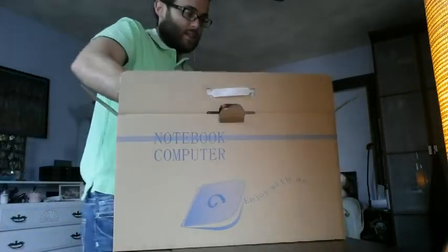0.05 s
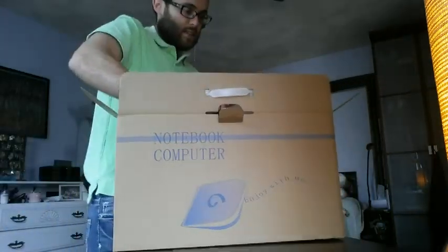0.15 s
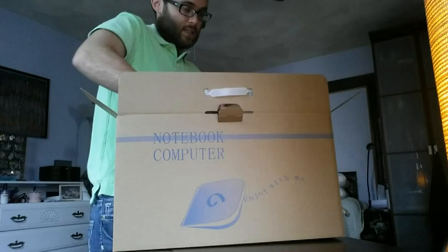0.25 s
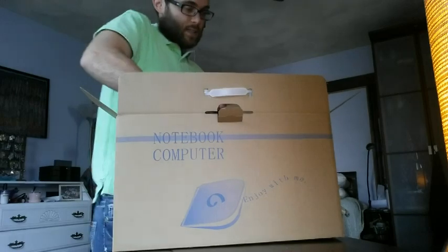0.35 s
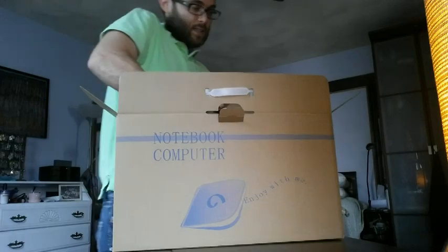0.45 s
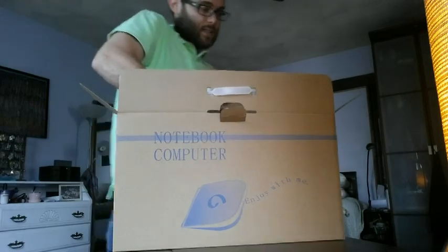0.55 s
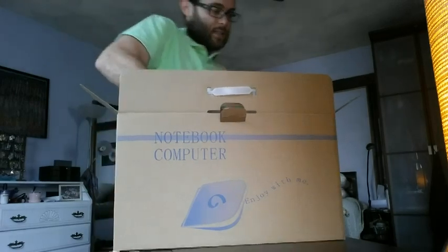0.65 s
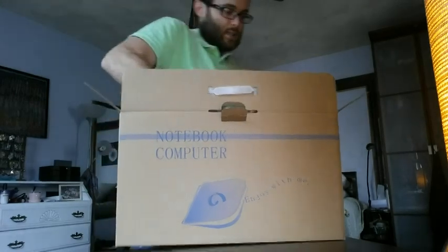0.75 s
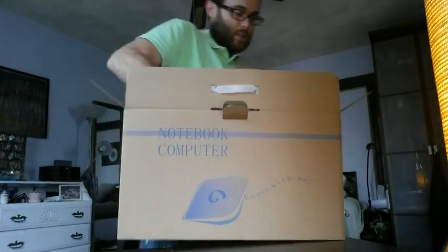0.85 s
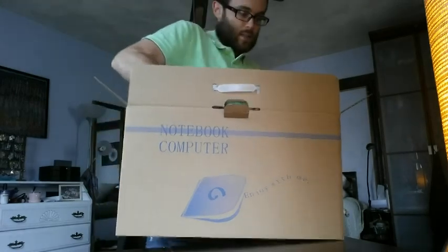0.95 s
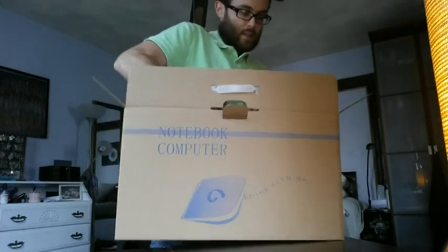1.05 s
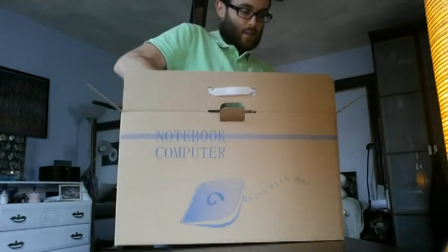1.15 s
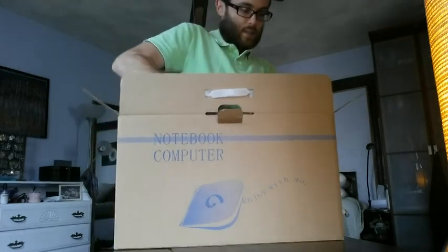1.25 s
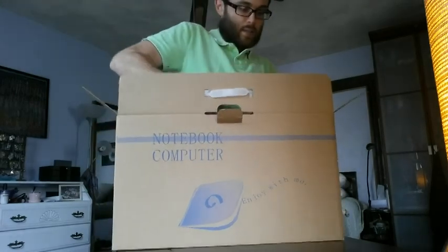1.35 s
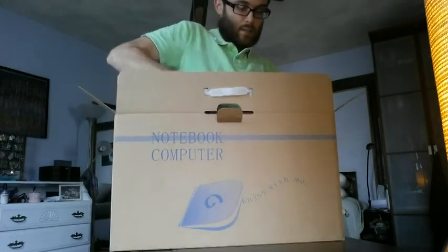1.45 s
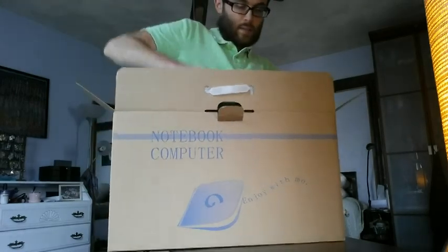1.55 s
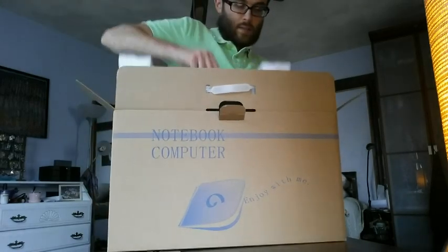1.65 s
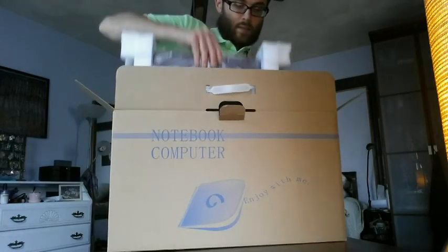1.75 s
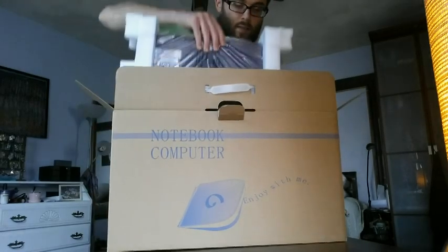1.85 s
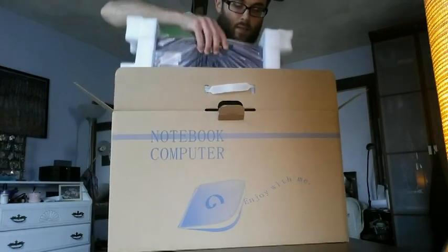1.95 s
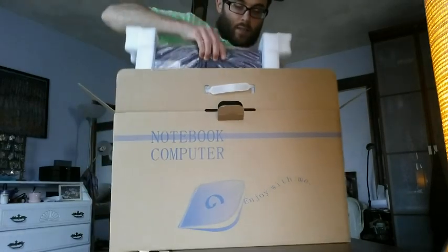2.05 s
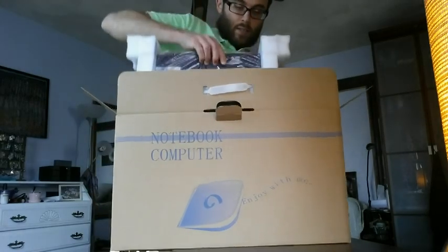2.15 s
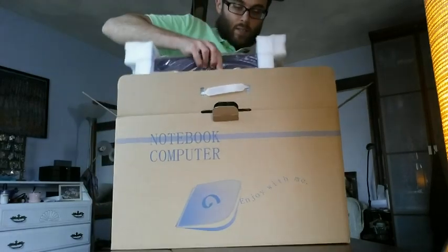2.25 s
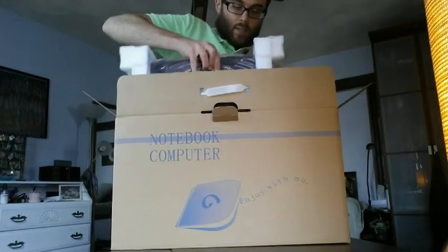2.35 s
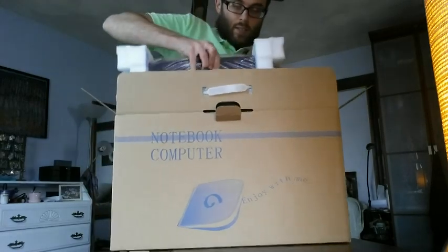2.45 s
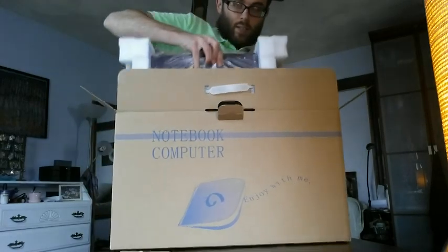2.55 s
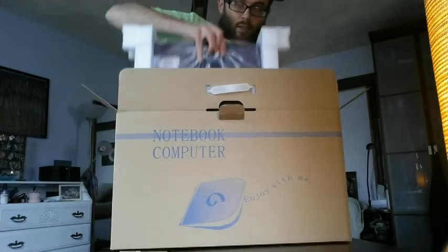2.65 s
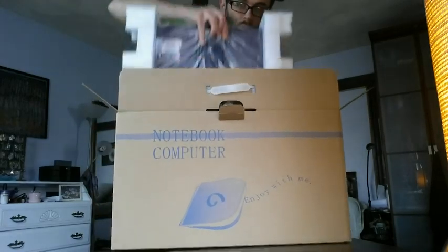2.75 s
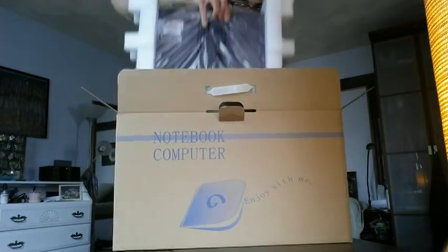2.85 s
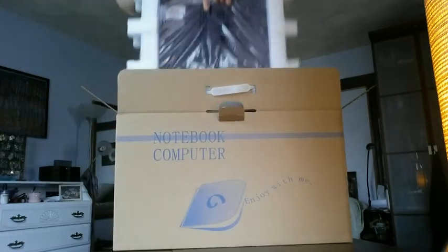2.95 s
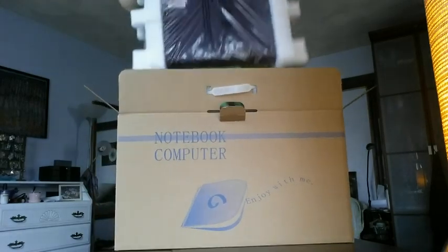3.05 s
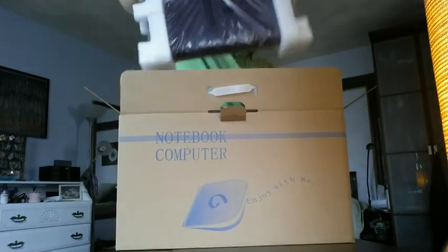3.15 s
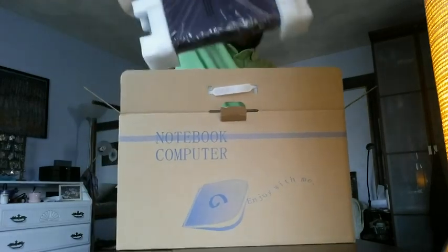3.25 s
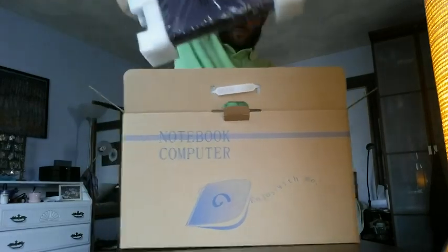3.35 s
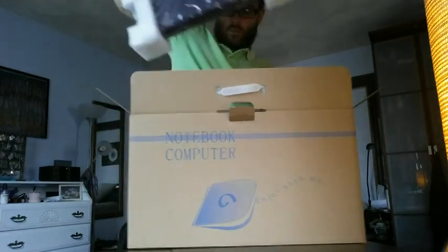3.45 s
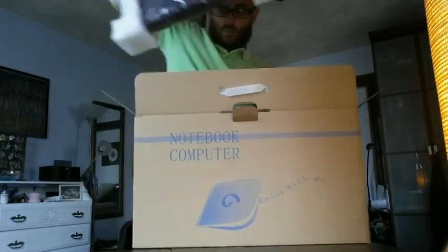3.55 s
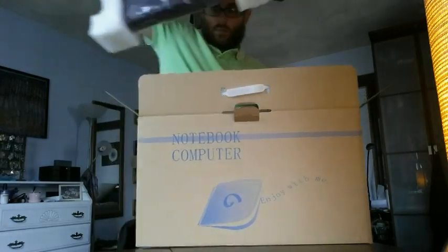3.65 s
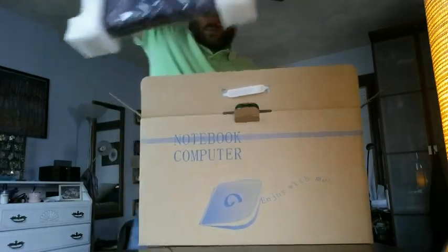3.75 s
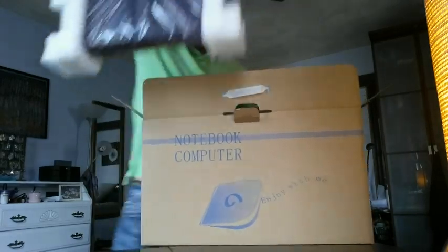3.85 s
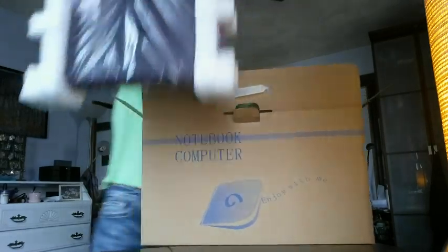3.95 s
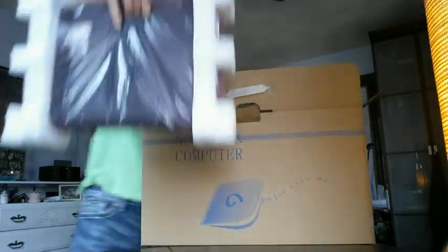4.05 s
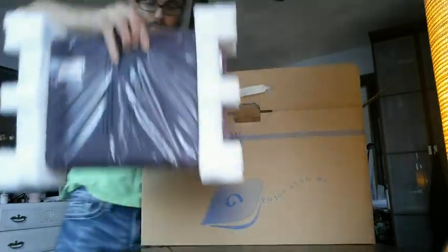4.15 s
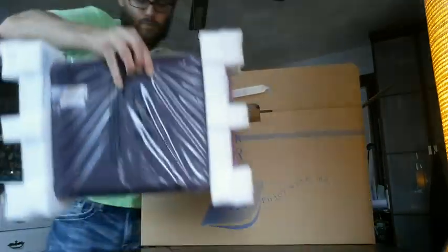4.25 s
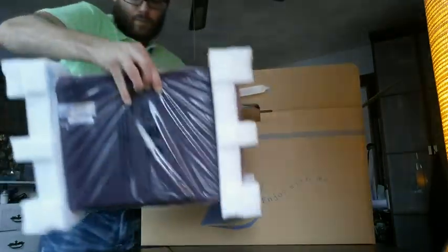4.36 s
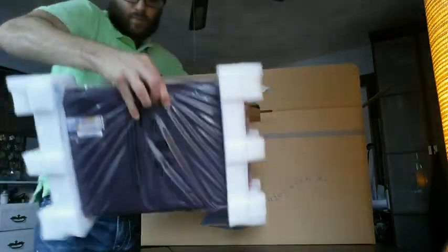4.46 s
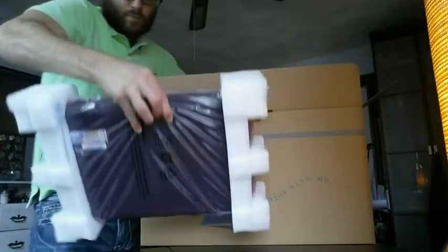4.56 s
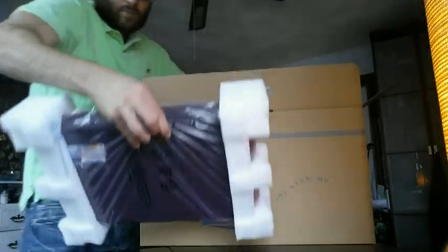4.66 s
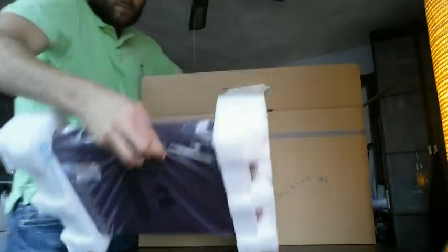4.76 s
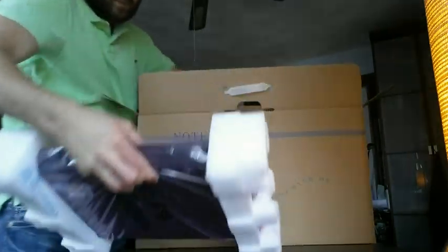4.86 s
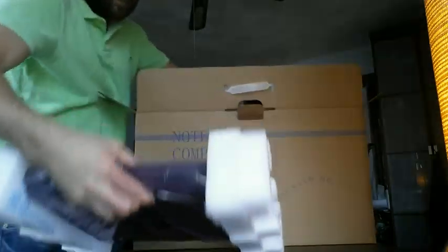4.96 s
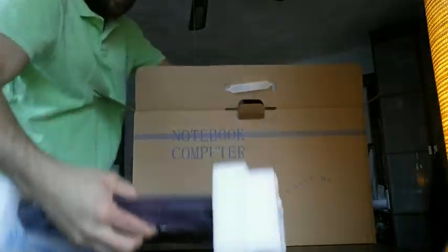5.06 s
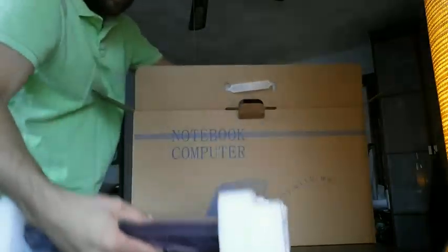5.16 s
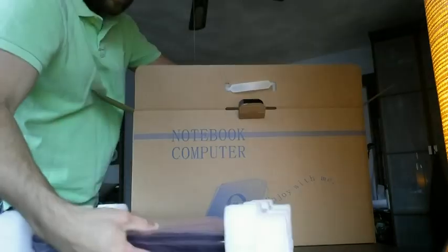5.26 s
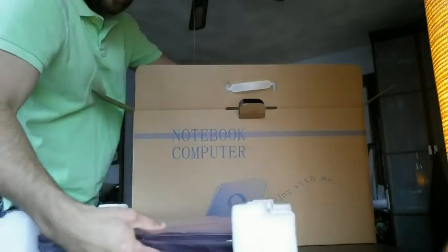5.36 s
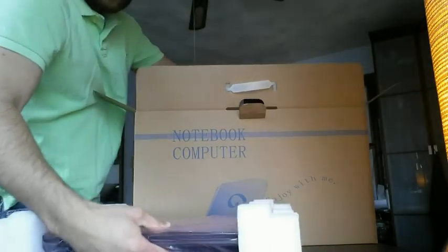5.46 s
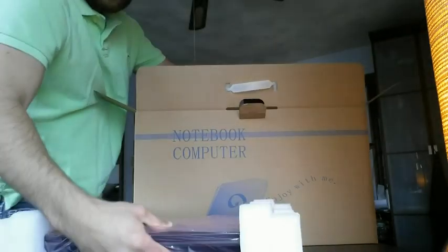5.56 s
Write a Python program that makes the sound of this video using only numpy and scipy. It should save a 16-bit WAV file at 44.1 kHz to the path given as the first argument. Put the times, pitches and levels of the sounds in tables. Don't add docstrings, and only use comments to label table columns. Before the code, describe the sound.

Close, bright, nearly mono indoor sound of unpacking: brittle plastic crackle and dry foam scraping against cardboard, low box bumps beneath. One loud snap at about a second and a half, then rougher dragging with hollow thumps. Around three seconds the emptied carton lands in a rapid cluster of dull booms and clatter, then faint handling, and finally renewed crinkly rustling over faint room hush.

```python
import sys
import numpy as np
from scipy import signal
from scipy.fft import rfft, irfft
from scipy.io import wavfile
from scipy.ndimage import map_coordinates

SR = 44100
rng = np.random.default_rng(int(sys.argv[2]) if len(sys.argv) > 2 else 0)


def voltage_ratio(level):
    return 10 ** (np.asarray(level, float) / 20)


def waveform_to_disk(signal):
    frames = np.transpose(np.atleast_2d(signal))
    scaled = np.clip(frames, -1, 1) * 32767
    samples = np.round(scaled).astype(np.int16)
    wavfile.write(sys.argv[1], SR, samples)


N = 247709

# f/Hz, density/dB
SLEEVE_HISS = [(2650, -49.5), (4500, -14.5), (5180, -11), (6340, 2.5), (6600, 0), (8580, -16), (11000, -20),
               (13000, -26.5), (15000, -39), (16500, -63)]
# f/Hz, density/dB
FOAM_SCRAPE = [(560, -15.5), (950, -8.5), (1020, -9.5), (1380, -5.5), (1560, -7), (3790, -6.5), (4800, -9),
               (6240, -8), (10600, -120)]
TOUCH_S = [0.0, .004, .0115, .021]
EMPTY_S = 3.05


def rms_one(x):
    return x / np.sqrt(np.mean(x ** 2) + 1e-20)


def drift(rate):
    r = np.exp(-2 * np.pi * rate / SR)
    walk = signal.lfilter([1], [1, -2 * r, r * r], rng.standard_normal(N + SR))
    return rms_one(walk[SR:])


def colour(spectrum):
    hz, db = np.transpose(spectrum)
    grid = np.maximum(np.arange(4097) * SR / 8192, 1)
    log_gain = np.interp(np.log(grid), np.log(hz), db) * np.log(10) / 20
    cepstrum = irfft(log_gain)
    cepstrum[1:4096] *= 2
    cepstrum[4097:] = 0
    pulse = irfft(np.exp(rfft(cepstrum)))
    return pulse / np.sqrt(np.sum(pulse ** 2))


def through(x, spectrum):
    return signal.fftconvolve(x, colour(spectrum))[:N]


def grains(per_s, spread_db, smooth):
    sizes = voltage_ratio(spread_db * np.minimum(rng.exponential(1, N), 5)) * rng.choice([-1, 1], N)
    slips = rms_one(sizes * (rng.random(N) < per_s / SR))
    return rms_one(slips + smooth * rng.standard_normal(N))


def ring(force, modes):
    out = 0
    for hz, db, t60 in modes:
        r, w = voltage_ratio(-60 / (t60 * SR)), 2 * np.pi * hz / SR
        out = out + signal.lfilter([0, voltage_ratio(db) * np.sin(w)], [1, -2 * r * np.cos(w), r * r], force + 1e-18)
    return out


def patchy(x, depth_db, per_s, per_octave):
    hz, s, frames = signal.stft(x, SR, nperseg=256)
    rows, columns = np.meshgrid(per_octave * np.log2(hz / 200 + 1), per_s * s, indexing="ij")
    field = map_coordinates(rng.standard_normal((40, 200)), [rows, columns], order=1, mode="wrap")
    return signal.istft(frames * voltage_ratio(depth_db * field), SR, nperseg=256)[1][:N]


def hush():
    # f/Hz, density/dB
    floor = [(18, -31), (30, -29), (91, -17.5), (243, 3.5), (451, -13), (583, 0), (775, -15.5),
             (1400, -10.5), (2470, -14.5), (5230, -14), (6590, -4.5), (11300, -19), (14300, -27.5)]
    return voltage_ratio(-57.5 + 1.6 * drift(14)) * through(rng.standard_normal(N), floor)


def room(x):
    t60_s, wall_cut_hz, gap_s = 0.21, 4800, .004
    t = np.arange(SR // 2) / SR
    tail = rng.standard_normal(len(t)) * voltage_ratio(-60 * t / t60_s) * (t > gap_s)
    tail = signal.sosfilt(signal.butter(1, wall_cut_hz, fs=SR, output="sos"), tail)
    return signal.fftconvolve(x, tail / np.sqrt(np.sum(tail ** 2)))[:N]


def bumps():
    # t/s, thud level/dB, hollow ring level/dB, table level/dB, panel level/dB
    contacts = [(0.221, -47, -28, -49, -50), (0.489, -39, -59, -35.5, -39), (0.585, -29, -47, -48, -45),
                (0.789, -52, -52, -55, -42), (1.034, -35, -46, -37, -51), (1.508, -31, -18.5, -35, -45),
                (2.008, -33, -16, -30, -46), (2.312, -29, -23.5, -48, -50.5), (2.483, -35, -53, -50, -48),
                (2.776, -49, -54, -54, -42), (3.125, -30, -30, -22, -30), (3.216, -20, -39, -40, -36.5),
                (3.256, -28, -39, -46, -44), (3.312, -10, -13, -32, -32.5), (3.421, -14, -17.5, -36, -34),
                (3.487, -34, -15.5, -35, -43), (3.6, -60, -41, -60, -52), (3.895, -70, -70, -75, -61),
                (4.288, -55, -44, -68, -58.5), (4.435, -38, -55, -59, -56), (4.83, -43, -59, -72, -55),
                (5.352, -58, -56, -68, -54)]
    # f/Hz, level/dB, t60/s
    hollow = [
        (140, 0, .06),
        (129, -7, .38),
        (98, 2, .22),
    ]
    # f/Hz, level/dB, t60/s
    walls = [(202, -2.5, 0.082), (279, -1.5, 0.17), (336, 3, 0.054), (512, -6, 0.13), (553, 13, 0.015),
             (554, 6.5, 0.05), (760, -5, 0.076), (830, -22, 0.072)]
    touch_db = [-9, -7, -7.5, -11]
    large_panel_db, loaded_t60_s = -2, .3
    out, t = np.zeros(N + SR), np.arange(SR // 2) / SR

    flex = np.sin(2 * np.pi * 115 * t) * t * np.exp(-t / 0.0026)
    booms = np.array([ring(flex / np.abs(flex).sum(), [mode]) for mode in hollow])
    touch = t * np.exp(-2 * np.pi * 380 * t)
    push = sum(voltage_ratio(db) * np.roll(touch, round(later * SR)) for later, db in zip(TOUCH_S, touch_db))
    push = push / touch.sum()

    shape = (len(contacts), len(walls))
    bends = 1 + .045 * rng.uniform(-0.55, 1, shape)
    strengths = voltage_ratio(rng.normal(0, 3.5, shape)) * rng.choice([-1, 1], shape)
    size_db = np.where(np.array(walls)[:, 0] > 420, 0, large_panel_db)
    gaps = np.diff([row[0] for row in contacts], append=N / SR + 1)
    for (s, *boom_db, panel_db), strength, bend, gap in zip(contacts, strengths, bends, gaps):
        panels = np.array([ring(push, [(hz * b, db, t60)]) for (hz, db, t60), b in zip(walls, bend)])
        sound = voltage_ratio(np.add(boom_db, 1.5)) @ booms
        sound = sound + (voltage_ratio(panel_db + size_db + 9.5) * strength) @ panels
        sound = sound * voltage_ratio(-60 * t / loaded_t60_s * (s < EMPTY_S))
        smothered = np.exp(-np.maximum(t - gap, 0) / .008)
        out[round(s * SR):][:len(t)] += sound * smothered
    return out[:N]


def snaps():
    # t/s, peak level/dB, scrape level/dB, edge level/dB
    singles = [(0.3645, -15, -47, -52), (0.5375, -17, -50, -46), (0.574, -12.5, -52, -55),
               (0.643, -17, -54, -43), (0.717, -14, -47, -41), (0.895, -24, -62, -56),
               (0.9657, -33, -33, -56), (0.9913, -13.5, -34, -50), (1.1598, -18, -40.5, -44),
               (1.504, 0, -23, -40), (1.5123, -5.5, -25, -23), (1.549, -14.5, -30, -50),
               (2.1787, -10, -30, -35), (2.2394, -19, -32, -49), (2.2656, -18, -32, -39.5),
               (2.3486, -14.5, -37, -47), (2.92, -15, -52, -52), (3.104, -21.5, -59, -53),
               (3.3124, -22, -36, -38.5), (3.8277, -15, -56, -65), (4.1614, -20, -52, -51),
               (4.276, -45, -46, -58), (4.3968, -16.5, -31.5, -49), (4.8831, -16.5, -32, -63),
               (4.9093, -14.5, -43, -46), (5.1247, -10, -55, -44), (5.159, -14, -53, -45),
               (5.466, -18, -46, -55), (5.3542, -11.5, -50, -42), (5.4927, -17, -36, -44)]
    # t/s, peak level/dB, scrape level/dB, edge level/dB, loss per touch/dB
    runs = [(0.7871, -5, -31.5, -27, 6.5), (1.987, -11, -32.5, -41, 2.5), (2.0322, -8.5, -27, -45, 10),
            (2.3024, -10, -36, -33, 13), (2.4526, -11, -41, -37, 3), (2.5107, -9.5, -37, -37.5, 16),
            (3.1221, -1.5, -22, -26.5, 0.6), (3.2161, -2, -22.5, -41, 3), (3.3185, -7, -27.5, -46, 3.5),
            (3.423, -12.5, -31, -39.5, 2), (3.4917, -27, -34, -55, 9)]
    # f/Hz, density/dB
    edge = [(5000, -33.5), (9000, -13), (12000, 9), (15000, -5.5), (16500, -32.5)]
    edge_loss_db, snap_t60_s, run_t60_s = 8.5, 0.016, 0.022
    parts, t = np.zeros((3, N)), np.arange(SR // 5) / SR
    spatter = grains(per_s=1500, spread_db=1.0, smooth=0.58)

    events = [(*row, snap_t60_s) for row in singles]
    for s, peak_db, scrape_db, edge_db, loss_db in runs:
        for k, later in enumerate(TOUCH_S):
            events.append((s + later, peak_db - k ** 1.2 * loss_db, scrape_db - k ** 1.1 * loss_db,
                           edge_db - k * edge_loss_db, run_t60_s))
    for s, peak_db, scrape_db, edge_db, t60 in events:
        i = round(s * SR)
        shape = (1 - np.exp(-t / 0.0012)) * voltage_ratio(-60 * t / t60)
        burst = spatter[i:i + len(t)] * shape[:N - i]
        burst = burst / np.sqrt(np.sum(burst ** 2) / np.sum(shape ** 2))
        burst[12] += 4.0
        parts[:, i:i + len(t)] += voltage_ratio([[peak_db - 8.0], [scrape_db + 0.5], [edge_db + 3]]) * burst
    return through(parts[0], SLEEVE_HISS) + through(parts[1], FOAM_SCRAPE) + through(parts[2], edge)


def strokes(t, column):
    # peak t/s, rise/s, fall/s, sleeve level/dB, box wall level/dB
    grope = [(0.0, .1, .16, -37.5, -56), (0.186, 0.059, .16, -34, -50), (0.39, 0.096, 0.067, -29, -36),
             (0.502, 0.064, 0.087, -35, -44.5), (0.588, 0.0098, 0.032, -38, -64),
             (0.65, 0.045, 0.15, -39, -46.5), (0.72, 0.022, 0.1, -31, -40),
             (0.785, 0.013, 0.038, -25.5, -42), (0.84, 0.064, 0.056, -38.5, -45),
             (0.99, 0.17, .1, -44, -43.5), (1.1, 0.34, 0.1, -39, -48)]
    # peak t/s, rise/s, fall/s, sleeve level/dB, box wall level/dB
    pull = [(1.27, 0.094, 0.17, -37.5, -45), (1.471, 0.27, 0.077, -32, -44.5),
            (1.52, 0.032, 0.064, -21.5, -45), (1.721, 0.45, 0.16, -24, -39.5),
            (1.902, 0.23, 0.064, -25, -42), (2.03, 0.13, 0.19, -30.5, -44),
            (2.18, 0.026, 0.066, -34.5, -45.5), (2.27, 0.12, 0.065, -35.5, -52),
            (2.36, 0.1, 0.059, -37.5, -60), (2.42, 0.16, 0.095, -33.5, -45.5),
            (2.464, 0.025, 0.042, -30, -44.5), (2.511, 0.031, 0.023, -37, -51),
            (2.68, 0.2, 0.04, -34, -43.5), (2.793, 0.15, 0.16, -24, -45.5), (2.95, 0.088, 0.1, -35.5, -48),
            (3.008, 0.022, 0.038, -39, -64)]
    # peak t/s, rise/s, fall/s, sleeve level/dB, box wall level/dB
    handle = [(3.11, 0.0082, 0.15, -43.5, -63), (3.183, 0.094, 0.2, -34, -53),
              (3.381, 0.084, .1, -37, -45.5), (3.501, 0.089, 0.1, -36.5, -45.5),
              (3.64, 0.15, 0.058, -48.5, -60.5), (3.829, 0.076, 0.03, -48.5, -54),
              (3.9, 0.024, 0.036, -52, -54), (3.99, 0.013, 0.017, -55, -76), (4.1, 0.066, 0.13, -66, -65),
              (4.27, 0.21, 0.21, -53.5, -63), (4.396, 0.067, 0.36, -55, -66), (4.7, 0.11, 0.17, -53, -73),
              (4.86, .15, 0.034, -48.5, -54.5), (4.911, 0.036, 0.019, -36, -47),
              (4.985, 0.083, 0.034, -37.5, -56), (5.05, 0.043, 0.065, -37.5, -53.5),
              (5.16, 0.12, 0.27, -30, -51.5), (5.29, 0.14, 0.15, -29, -51), (5.41, 0.086, 0.068, -41, -51),
              (5.477, 0.079, 0.11, -30, -51.5), (5.58, .08, 0.061, -34, -54)]
    still_db, roundness, taper = -76, 1.03, 0.74
    power = voltage_ratio(2 * still_db)
    for row in grope + pull + handle:
        peak_s, rise_s, fall_s = row[:3]
        away = np.where(t < peak_s, (peak_s - t) / rise_s, (t - peak_s) / fall_s)
        swell = (1 - np.minimum(away, 1) ** roundness) ** taper
        power = power + (voltage_ratio(row[column]) * swell) ** 2
    return 10 * np.log10(power)


def rubbing():
    # t/s, level/dB
    strain = [(0.0, -52.5), (0.46, -51.5), (0.85, -48.5), (1.18, -63.5), (1.46, -47.5), (1.9, -48),
              (2.18, -53), (2.5, -51), (2.7, -62), (2.8, -47.5), (3.04, -59), (3.09, -58), (3.7, -61.5),
              (4.29, -65.5), (4.65, -70), (4.88, -57), (5.1, -63.5), (5.62, -59.5)]
    # f/Hz, level/dB, t60/s
    caps = [(1417, -34.5, 0.019), (3440, -31.5, 0.011), (4950, -40, 0.018)]
    # f/Hz, density/dB
    board = [(140, -59), (230, -1), (307, -5), (343, 1), (433, -6.5), (534, 2), (634, -1), (858, -5.5),
             (1000, -12.5), (1300, -65), (2200, -120)]
    # f/Hz, density/dB
    boom = [(18, -27), (30, -55), (49, -14), (70, -12.5), (92, -5), (134, -3.5), (183, -12), (240, -4),
            (310, -21), (530, -120)]
    t = np.arange(N) / SR
    hiss_db, boom_db = strokes(t, column=3), np.interp(t, *np.transpose(strain))
    scrape_db = -41 + 0.88 * (hiss_db + 30.5)
    wall = np.hypot(voltage_ratio(strokes(t, column=4)), voltage_ratio(boom_db - 4))

    grip_db = 0.54 * drift(16) + 0.4 * drift(61)
    fine = grains(per_s=1500, spread_db=1.5, smooth=1.15) * voltage_ratio(grip_db)
    folds = voltage_ratio(-11.5) * grains(per_s=200, spread_db=1.5, smooth=0.05)
    coarse = grains(per_s=300, spread_db=2.5, smooth=1.14) * voltage_ratio(1.1 * grip_db + 1.2 * drift(32))

    foam = fine * voltage_ratio(scrape_db)
    out = through((fine + folds) * voltage_ratio(hiss_db), SLEEVE_HISS) + through(foam, FOAM_SCRAPE)
    out += ring(foam * (t > EMPTY_S), caps)
    out += through(coarse * wall, board)
    return out + through(coarse * voltage_ratio(boom_db + 3.4 * drift(2.9)), boom)


def scene():
    sharp, dull = patchy(snaps(), depth_db=-0.5, per_s=30, per_octave=2.614), bumps()
    echoes = room(voltage_ratio(-9.5) * sharp + voltage_ratio(-19) * dull)
    bass_cut = signal.butter(4, 79, "high", fs=SR, output="sos")
    dull = signal.sosfilt(bass_cut, dull + echoes)
    mono = patchy(rubbing() + hush(), depth_db=2.5, per_s=15, per_octave=3.487) + sharp + dull
    side = voltage_ratio(-46) * room(mono)
    return np.array([mono + side, mono - side])


def roll_off(x):
    return signal.sosfilt(signal.butter(12, 15270, fs=SR, output="sos"), x)


def record(dry):
    treble_hz, faint_db = 10040, -37
    hz, _, frames = signal.stft(dry, SR, nperseg=2048)
    weight = np.minimum(hz / 400, 1)[:, None]
    whole = np.linalg.norm(frames * weight, axis=1, keepdims=True)
    whole = whole ** 1.145 * voltage_ratio(0.75 * rng.standard_normal(whole.shape[2]))
    kept = (np.abs(frames) > voltage_ratio(faint_db) * whole) | (hz < treble_hz)[:, None]
    thin = signal.istft(frames * kept, SR, nperseg=2048)[1][:, :N]
    return roll_off(thin)


dry = scene()
out = record(dry)
waveform_to_disk(out)
```